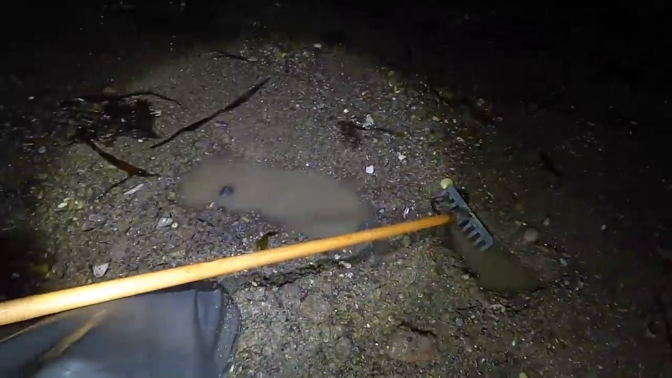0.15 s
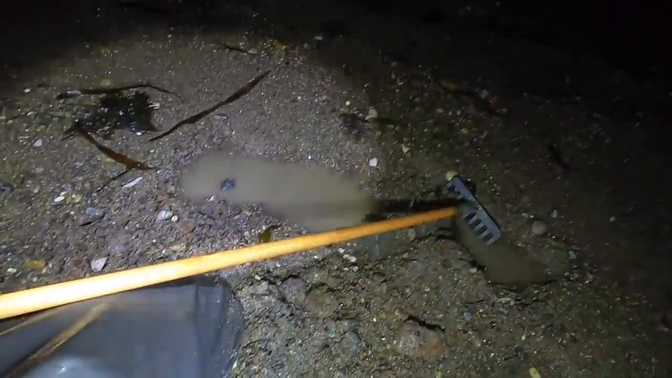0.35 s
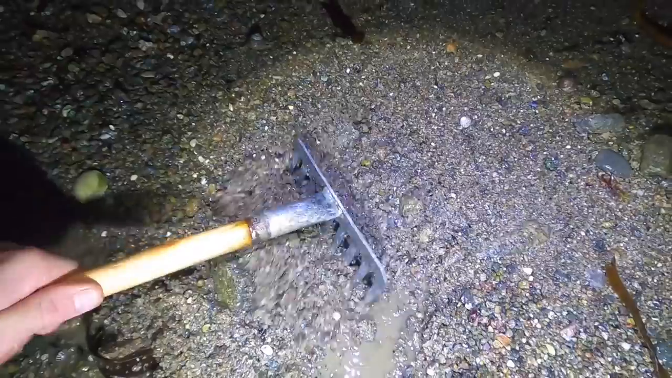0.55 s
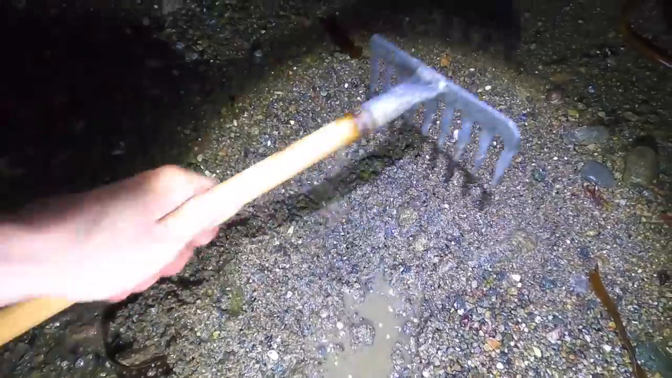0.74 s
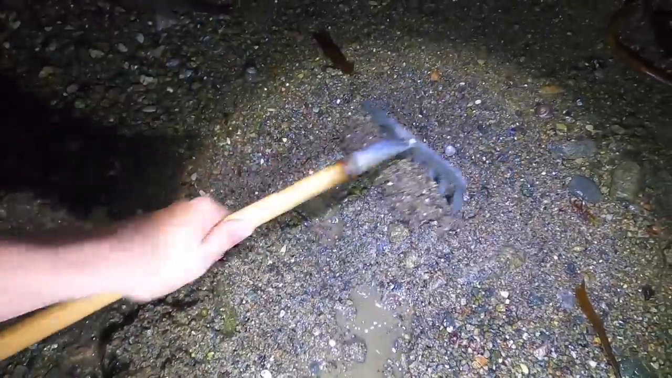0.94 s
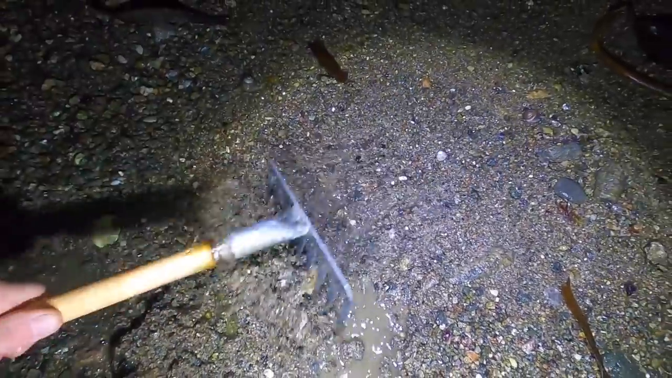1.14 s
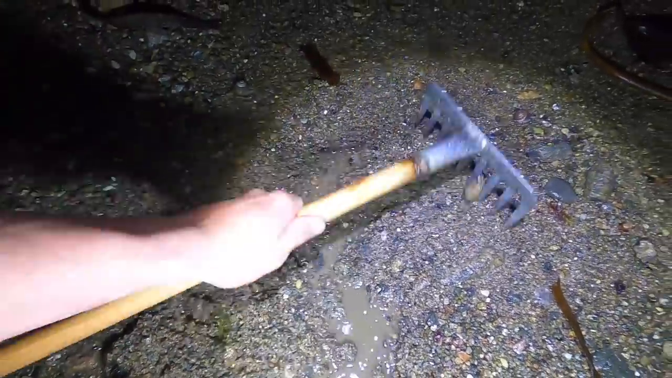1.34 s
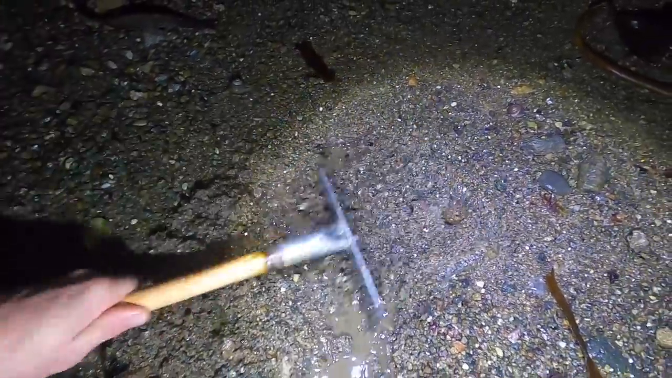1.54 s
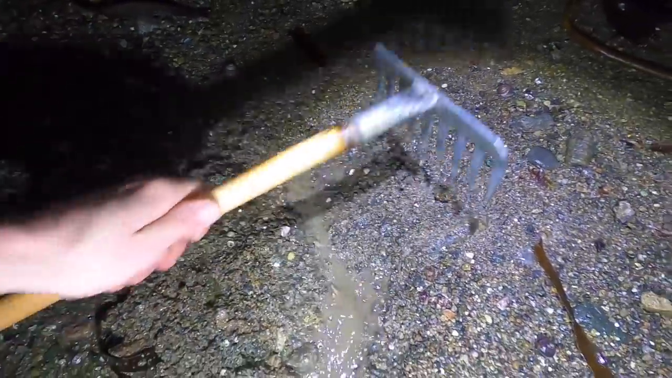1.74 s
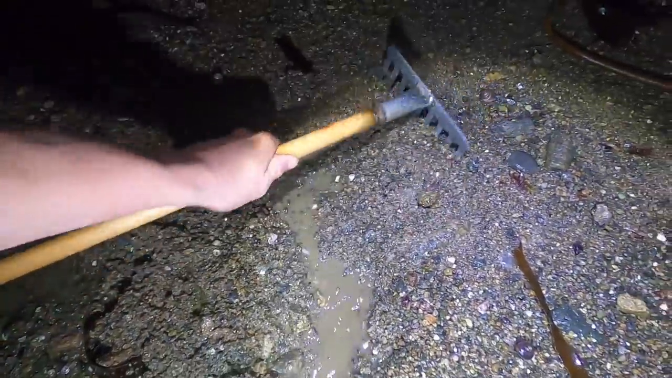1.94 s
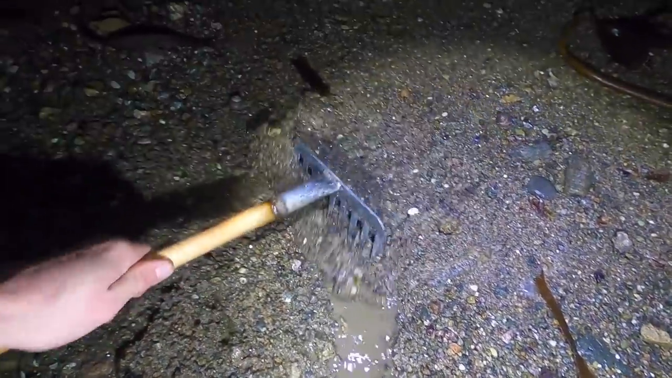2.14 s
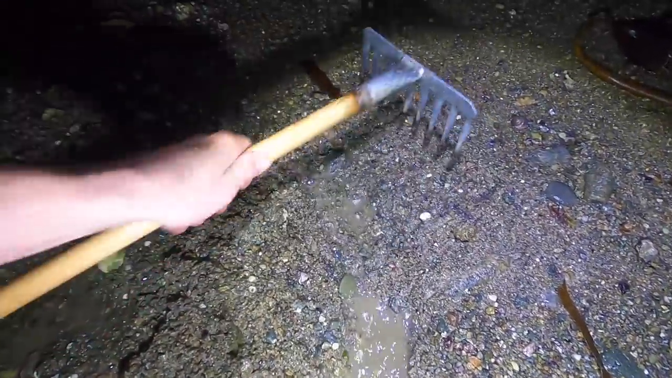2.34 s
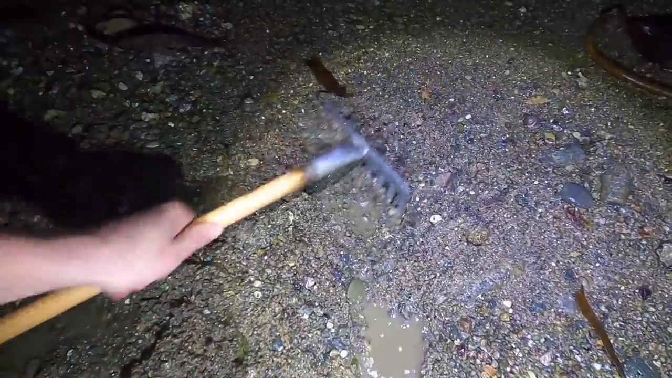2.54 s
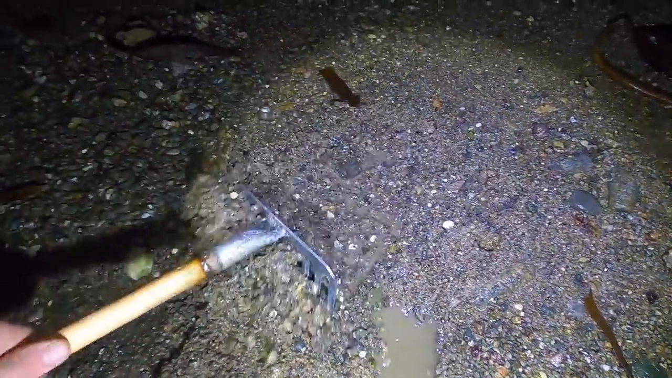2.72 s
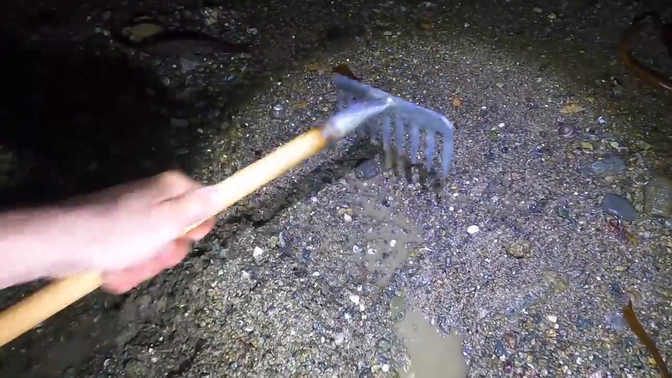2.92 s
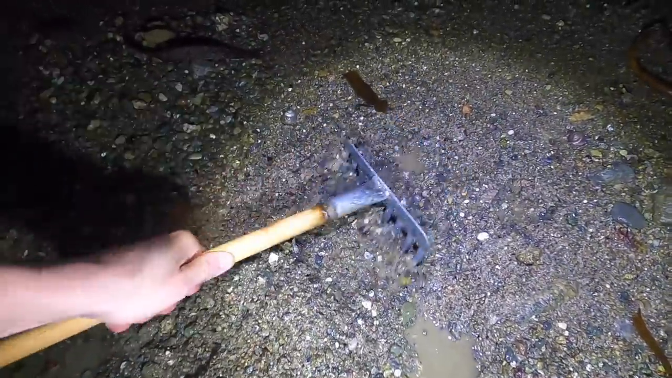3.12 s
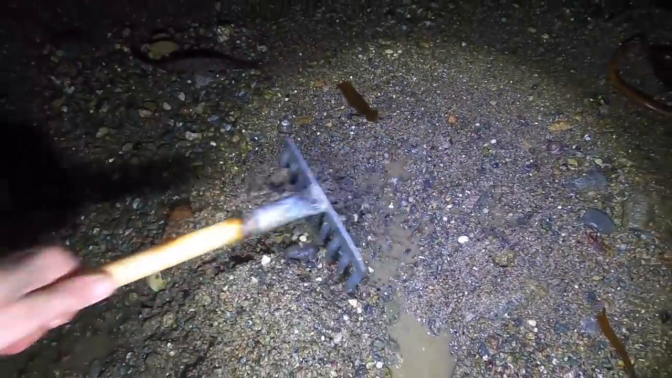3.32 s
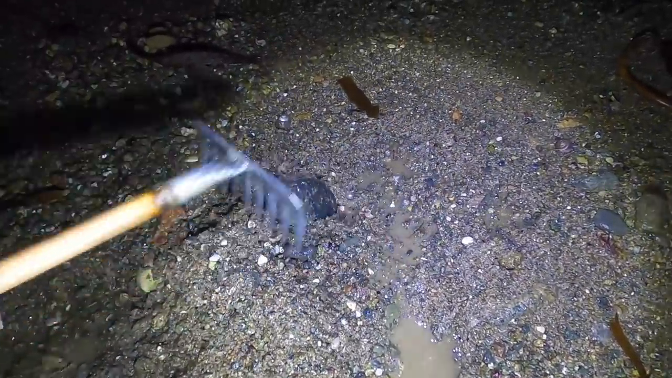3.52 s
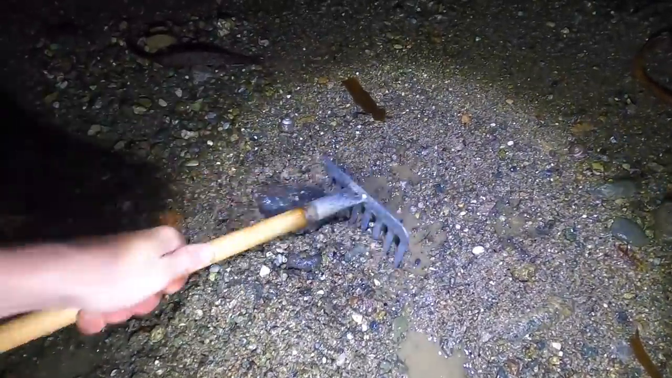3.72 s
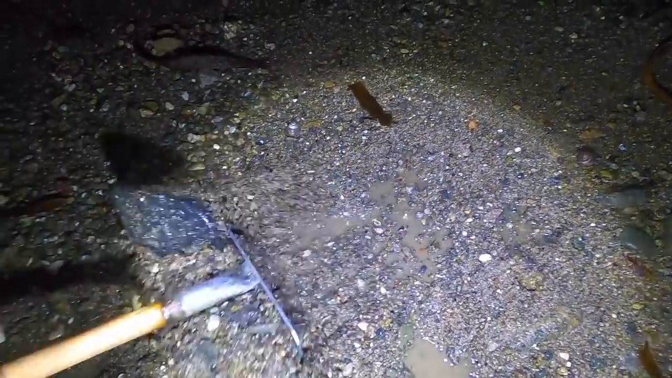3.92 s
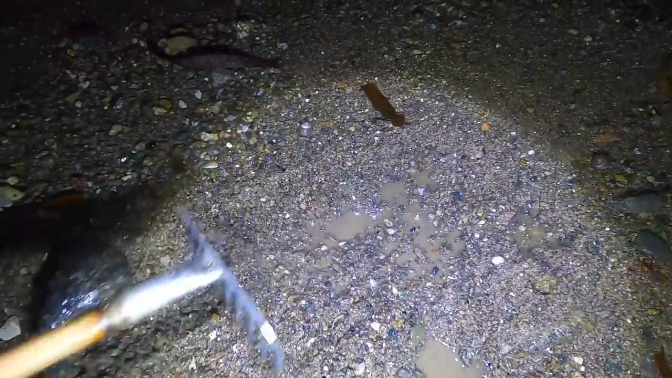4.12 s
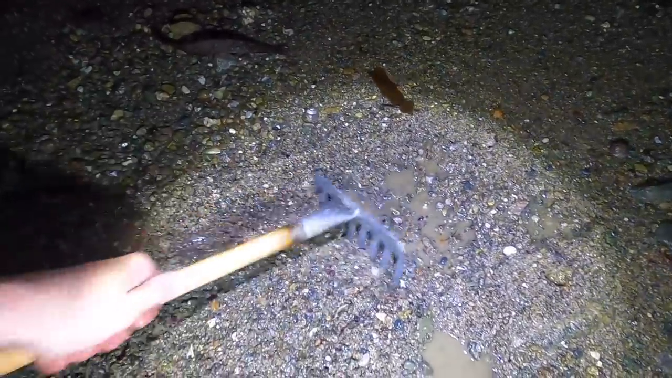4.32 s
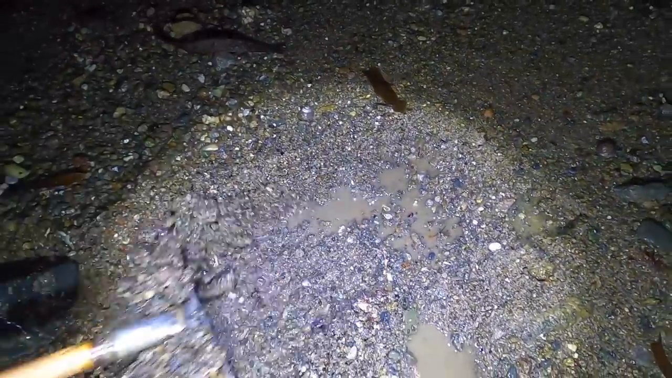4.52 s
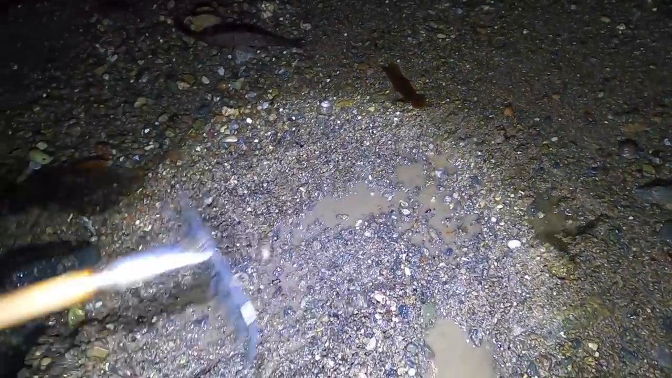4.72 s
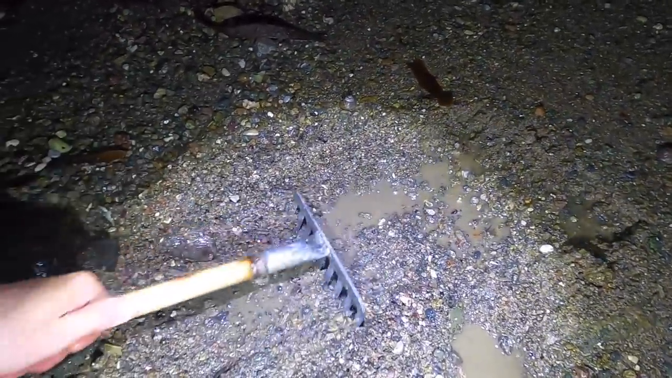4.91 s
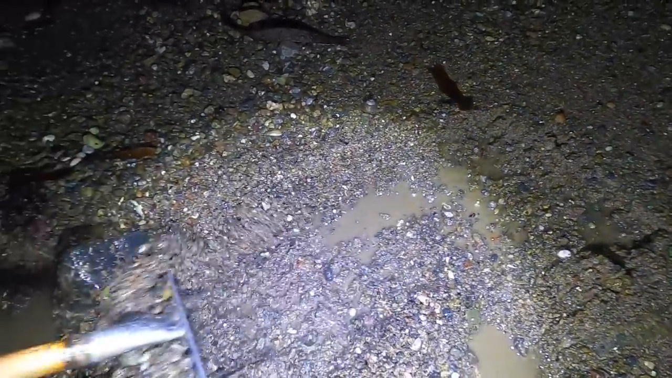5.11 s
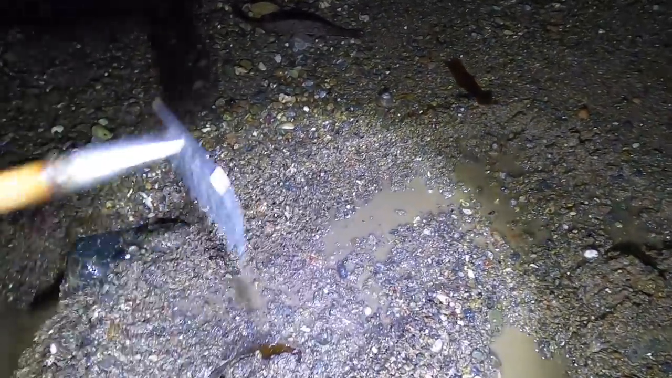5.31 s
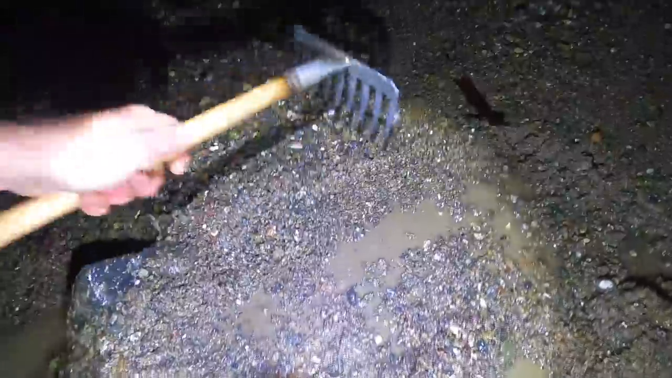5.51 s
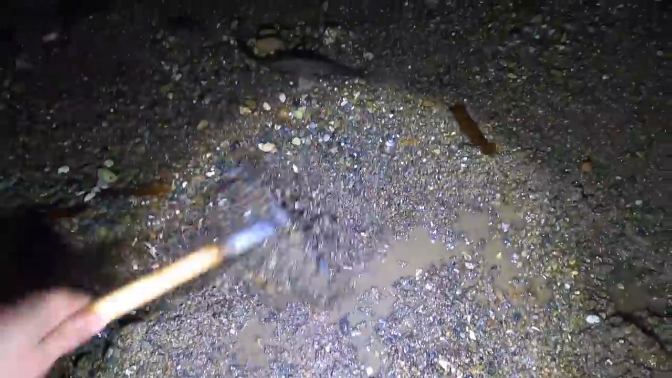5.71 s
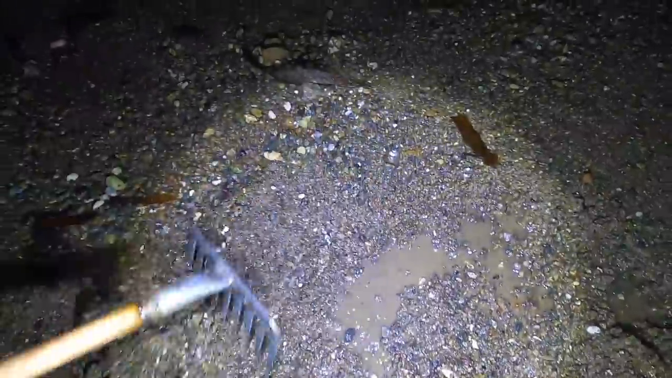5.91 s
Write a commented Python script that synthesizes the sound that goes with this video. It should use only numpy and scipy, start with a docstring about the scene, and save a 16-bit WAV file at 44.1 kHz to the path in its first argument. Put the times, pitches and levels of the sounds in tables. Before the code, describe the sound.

Close outdoor sound of a metal rake working wet, stony beach ground. A soft clothing shift comes first, then brisk, uneven strokes: tines stab in, crunch through pebbles and stop abruptly. Single stones knock brightly, steel briefly rubs on rock, and loose wet grit slides back in fine clicks. Light wind rumbles low on the microphone, strongest at the start and soft afterwards.

```python
"""On a gravel beach, a small steel rake works wet stones close by, after a faint rustle of clothing. Each
stroke stabs the tines in, stalls, then drags: random clicks, ringing pebbles and bright shells are filtered
into a crunch, and the clicks also ring the rake head. Single stones knock and the tines rub on rock. Wet grit
trickles back between strokes as fine clicks and tiny rings. Low-pitched noise makes the light wind that rumbles
on the microphone."""
import sys
import numpy as np
from scipy import signal
from scipy.fft import rfft, irfft
from scipy.io import wavfile

SR = 44100
rng = np.random.default_rng(int(sys.argv[2]) if len(sys.argv) > 2 else 0)


def dump_mix(stems):
    """Bounce the given channels to the path in sys.argv[1] as a 16-bit WAV at rate SR."""
    frames = np.atleast_2d(stems).T  # one column per channel
    limited = np.clip(frames, -1, 1)  # hard clip at full scale
    pcm = np.round(limited * 32767).astype(np.int16)
    wavfile.write(sys.argv[1], SR, pcm)


N = 267092
T = np.arange(N) / SR  # time of every sample [s]

# the rake is dragged: (time [s], length [s], time to bite [s], force midway [dB], swell from start to end [dB],
# thud of the packed bed [dB relative], coarse stones [dB relative], fine grit [dB relative],
# spill afterwards [dB relative])
PULLS = [(0.589, 0.059, 0.012, -18, 6, -22, -15.5, -7, -18.5),
         (1.008, 0.21, 0.051, -19.5, -11.5, -20.5, -6.5, -9, -13),
         (1.517, 0.21, .020, -21, -6.5, -17, -15, -7, -20),
         (2.043, 0.14, 0.071, -18, 4, -17.5, -7.5, -9, -16),
         (2.193, .051, 0.011, -26.5, 24, -14, -13.5, -8, -17),
         (2.575, 0.13, 0.029, -19.5, 6.5, -24.5, -9.5, -9.5, -0.5),
         (3.157, 0.091, 0.017, -21.5, 8, -23.5, -9, -5.5, -18),
         (3.858, 0.12, 0.024, -22, 6.5, -15, -2.5, -5, -9),
         (4.460, 0.18, 0.037, -21, -5, -23, -4.5, -8, -3),
         (5.017, 0.17, 0.014, -21.5, 4, -20, -4.5, -4.5, -8),
         (5.724, 0.12, 0.022, -21, -1.5, -23, -9.5, -7.5, 1.5)]
# tone of the dragged gravel: (frequency [Hz], gain [dB])
PULL_COLOUR = [(100, -23.5), (250, -17.5), (450, -11), (700, -0.5), (1000, 1), (1500, 5.5), (2300, 2.5),
               (4300, -1), (5500, -7), (7200, -8.5), (8200, -10.5), (11000, -15.5), (15500, -32.5)]
BITE_DB = -14  # a pull starts this far below full force
STOP_S = 0.0095  # the crunch dies this fast when the rake stops
# change from start to end of a pull as the tines sink: coarse stones grow, fine grit fades
SINK_COARSE_DB, SINK_FINE_DB = 7, -2
SINK_HEAVY_DB = -1  # the deepest clacks thin out as the rake comes nearer
# the heap pushed up by the tines tumbles to rest, fading ever faster
SPILL_S, SPILL_FALL_DB, SPILL_BEND = 0.098, -9, 1.64
SPILL_HEAVY_DB = -2.5  # few heavy stones roll in the spill

# the tines stab into the gravel: (time [s], length [s], force [dB], first touch [dB relative],
# coarse stones [dB relative])
STABS = [(0.578, 0.013, -20.5, -31, 7), (0.971, 0.014, -23.5, -15.5, 6), (1.482, .013, -19.5, -16.5, 1),
         (2.007, .017, -22.5, -14.5, 2), (2.544, 0.0081, -18.5, -11.5, -0.5),
         (3.108, .0043, -18.5, -11, -10), (3.127, 0.018, -22, -19, 4), (3.472, 0.011, -27.5, -0.5, 4),
         (3.809, 0.04, -19.5, -11, 1.5), (4.012, 0.022, -20, -7.5, 0), (4.418, 0.019, -20, -11, -1),
         (4.98, 0.027, -23.5, -5.5, 2), (5.691, 0.016, -18, -20, 4)]
# tone of the stabbed gravel: (frequency [Hz], gain [dB])
STAB_COLOUR = [(150, -43), (250, -7.5), (483, -14), (799, -10), (1130, -15.5), (1470, -12), (2220, 1.5),
               (2470, -7), (2940, -8), (3370, -4), (3880, -2.5), (5780, -9), (7360, -6), (11400, -17.5),
               (15800, -25.5)]
STAB_COARSE_HZ = 1910  # the coarse stones of a stab sound below this

# ways the rake head rings, damped by the gravel:
# (frequency before detuning [Hz], time to fade by 60 dB [s], level before random change [dB])
RAKE_MODES = [(646, 0.18, -48), (799, 0.11, -13.5), (1456, 0.034, -2.5), (1756, 0.037, -4),
              (2660, 0.013, 2.5), (2898, 0.051, 1.5), (3823, 0.034, 3), (4110, 0.017, 6.5),
              (4480, 0.04, -1), (4650, 0.25, -13.5), (6280, 0.033, -9.5), (6970, 0.012, 2.5)]
# a tine knocks a single stone: (time [s], strength [dB], pitch of the stone [Hz],
# time for its ring to fade by 60 dB [s], ring of the rake [dB relative])
KNOCKS = [(0.001, -27.5, 1473, 0.075, 12.5), (0.109, -20, 2460, 0.0017, -14),
          (0.645, -7.5, 2780, 0.038, -24), (0.733, -30.5, 4570, 0.1, -6), (1.133, -8.5, 2870, .008, -16),
          (1.147, -17, 5130, .03, -8), (1.265, -30, 810, 0.08, 9), (1.389, -19.5, 4630, 0.00082, -17),
          (1.542, -14.5, 3960, 0.007, 5), (1.572, -13, 2700, 0.023, 8.5), (1.611, -5.5, 1460, 0.034, -16),
          (1.655, -23, 830, 0.044, 0), (1.658, -24, 2040, 0.23, -6), (1.691, -11, 4070, 0.02, 2),
          (1.710, -16, 6760, .008, 3), (1.725, -33, 840, .19, 1), (1.788, -25.5, 980, .008, -19),
          (1.882, -27.5, 9100, 0.0075, -8), (1.922, -29, 2320, 0.0029, -16), (2.027, -10.5, 2740, .009, -8),
          (2.059, -21, 4100, 0.0081, 6), (2.103, -14, 1810, .01, -4), (2.186, -7.5, 3940, .006, 4.5),
          (2.551, -16, 3800, .015, 5), (2.597, -10, 2940, 0.02, -7), (2.609, -13, 7330, 0.033, 8),
          (2.749, -7.5, 4100, 0.014, -14), (3.111, -16, 6740, 0.032, 8.5), (3.163, -20.5, 1410, 0.15, -2),
          (3.246, -13.5, 630, 0.059, -5), (3.422, -13, 3840, 0.008, -2), (3.470, -17, 2990, 0.077, 8),
          (3.481, -23, 4490, 0.078, 2), (3.527, -29.5, 6840, 0.0068, 8), (3.596, -29, 4150, .034, -11),
          (3.874, -17.5, 1830, 0.016, -1), (3.976, -7, 4030, .025, -17), (4.09, -18, 1070, 0.037, -13),
          (4.104, -16, 815, .036, -3), (4.321, 0.5, 2470, 0.0021, -25), (4.428, -6.5, 4200, .011, -6),
          (4.439, -7.5, 2860, 0.014, -2), (4.526, -13, 980, 0.019, -18), (4.55, -10, 4060, .017, -1),
          (4.607, -11.5, 3770, .018, -12), (4.716, -12.5, 1770, 0.021, -7), (4.97, -23, 4570, 0.086, -12),
          (4.991, -9, 3870, 0.025, -4), (5.104, -17, 867, 0.011, 9.5), (5.166, -18, 880, .023, -5),
          (5.18, -20, 1800, 0.023, -13), (5.864, -16, 1020, 0.071, 7.5), (5.915, -13.5, 2020, 0.032, -22),
          (5.96, -15, 3230, .015, -9)]

# the tines rub along a buried rock, one list for each rub: (time [s], level [dB])
ROCK_RUBS = [
    [(1.55, -35), (1.59, -22), (1.68, -32.5), (1.73, -54), (1.80, -61)],
    [(3.38, -38), (3.42, -32), (3.48, -33.5), (3.55, -44), (3.66, -37.5), (3.71, -66)],
]
# ringing of that rubbing:
# (frequency before detuning [Hz], time to fade by 60 dB [s], level before random change [dB])
ROCK_MODES = [(678, 0.044, 0), (820, 0.028, 4), (1463, 0.023, 4), (2130, 0.023, 2), (2940, 0.054, 3),
              (4590, 0.054, -11)]

# wet grit slides back into the furrow: (time [s], length [s], strength at the start [dB],
# fading [dB per s], settling stones [dB relative], fine grit [dB relative])
SLIDES = [(0.67, .20, -34, 90, -2.5, -13.5), (1.274, 0.21, -48, 29, -3, -8.5),
          (1.757, 0.2, -49.5, 50, 1, -12), (2.355, 0.22, -58.5, 87, 2.5, -6),
          (2.94, 0.098, -41, 46, -7.5, -8.5), (3.315, 0.13, -34.5, 16, -5.5, -14.5),
          (3.497, 0.17, -40.5, -14, -2, -13.5), (3.703, 0.12, -48.5, 38, 2, -25),
          (4.043, 0.15, -32, 13, -1, -14.5), (4.234, 0.051, -29.5, 15, -5, -14),
          (4.355, 0.027, -36.5, 0, -2, -16), (4.717, 0.21, -34.5, 16, -6, -13.5),
          (5.29, 0.18, -39.5, -1, -10, -13), (5.458, 0.073, -35.5, 15, -11.5, -13),
          (5.56, .11, -43.5, 60, -2, -14), (5.943, 0.11, -34.5, 43, -10.5, -8.5)]
# tone of the sliding grit: (frequency [Hz], gain [dB])
TRICKLE_COLOUR = [(200, -27.5), (450, -3), (620, -11.5), (820, -1.5), (1800, -2), (4200, -7), (5500, -14),
                  (7400, -20), (8300, -24.5), (12500, -30.5), (15500, -39)]
SLIDE_START_S, SLIDE_STOP_S = 0.035, 0.05  # a slide gathers and comes to rest

# clothing shifts during the reach for the rake: (time [s], level before flutter [dB])
RUSTLE_LEVEL = [(0, -45.5), (0.07, -58), (0.2, -45.5), (0.3, -57), (0.39, -51.5), (0.56, -53.5),
                (0.66, -72)]
# tone of the fabric: (frequency [Hz], gain [dB])
RUSTLE_COLOUR = [(300, -1.5), (550, -1), (900, -5.5), (1500, -1), (2600, -6), (3100, -7.5), (3700, -5.5),
                 (5500, -12.5), (7500, -13.5), (8200, -21.5), (14000, -39)]

BREEZE_DB = -45  # the steady breeze, before its flutter
# gusts on the microphone: (time of the peak [s], half width [s], level before flutter [dB])
GUSTS = [(0.03, 0.026, -28.5), (0.21, 0.12, -32.5), (0.43, 0.046, -34.5), (0.56, 0.041, -32.5),
         (1.60, 0.047, -40), (2.10, 0.11, -35.5), (2.26, 0.032, -38.5), (2.66, 0.19, -35),
         (3.02, 0.07, -39), (3.22, 0.1, -39), (3.51, 0.1, -42.5), (3.76, 0.066, -38.5), (4.40, 0.16, -43.5),
         (4.98, 0.21, -40), (5.65, 0.22, -49)]
# the breeze drops for a moment: (time [s], half width [s], change [dB])
LULL = (1, 0.11, -8)
# tone of the wind: (frequency [Hz], gain [dB])
WIND_COLOUR = [(20, -1.5), (50, -0.5), (100, -6), (160, -10), (240, -20), (400, -23.5), (800, -47),
               (2000, -82)]
# the background starts wide and leaning left, then narrows to the centre:
# (time [s], side sound [dB relative], left minus right [dB])
BACKGROUND_WIDTH = [(0, -3, 6), (0.57, -3, 6), (0.66, -34, 0)]
TOP_HZ = 15700  # nearly nothing is left above this


def undb(db):
    """Turn decibels into a gain."""
    return 10 ** (np.asarray(db) / 20)


def unit(x):
    """Scale a sound to an average strength (rms) of 1."""
    return x / np.sqrt(np.mean(x ** 2))


def add(out, at, sound):
    """Mix a short sound in at a time in s."""
    i = int(at * SR)
    out[i:i + len(sound)] += sound[:len(out) - i]


def walk(rate):
    """Random wandering of rms 1: straight lines between fresh random values, rate of them a second."""
    knots = np.arange(0, 7, 1 / rate)
    return unit(np.interp(T, knots, rng.standard_normal(len(knots))))


def colour(x, points):
    """Shape the tone through (Hz, dB) points, with a filter that sounds only after its input."""
    hz, db = np.transpose(points)
    size = 4096
    freq = np.maximum(np.arange(size // 2 + 1) * SR / size, 1)
    log_gain = np.log(undb(np.interp(np.log(freq), np.log(hz), db)))
    # folding the cepstrum to one side keeps the gain and puts the energy first
    cepstrum = irfft(log_gain)
    cepstrum[1:size // 2] *= 2
    cepstrum[size // 2 + 1:] = 0
    response = irfft(np.exp(rfft(cepstrum)))
    return signal.fftconvolve(x, response)[:N]


def split(x, hz):
    """Return the parts below and above a frequency, without delay."""
    low = signal.sosfiltfilt(signal.butter(4, hz, fs=SR, output="sos"), x)
    return low, x - low


def ring(hz, t60):
    """One pure tone that fades by 60 dB in t60 seconds."""
    t = np.arange(int(t60 * SR) + 2) / SR
    return np.sin(2 * np.pi * hz * t) * np.exp(-np.log(1000) * t / t60)


def clicks(rate, spread_db, hardest=1.0):
    """Random contacts, on average rate a second, with scattered sizes and either sign; rms 1."""
    hit = rng.random(N) < rate / SR
    size = undb(spread_db * np.minimum(rng.standard_normal(N), hardest))
    return unit(hit * size * rng.choice([-1, 1], N))


def pebbles(rate, cycles, spread_db):
    """Stones of many sizes, each ringing for some cycles at its own pitch; rms 1."""
    out = np.zeros(N)
    draws = rng.random((int(rate * N / SR), 4))
    for when, size, force, damping in draws:
        hz = 550 * (1 + 3.6 * size) ** 2
        even = hz ** .75  # evens out the power per Hz
        gain = even * undb(spread_db * force ** 2)
        add(out, when * N / SR, gain * ring(hz, cycles * (.5 + damping) / hz))
    return unit(out)


def blow(modes, detune=0.018):
    """The answer to one blow, peak 1; mix and pitch of the modes shift with the tine that is hit and its load."""
    out = np.zeros(SR // 2)
    for hz, t60, db in modes:
        gain = undb(db + 2 * rng.standard_normal()) * rng.choice([-1, 1])
        pitch = hz * (1 + detune * rng.uniform(-0.865, 1))
        add(out, 0, gain * ring(pitch, t60))
    return out / np.abs(out).max()


def rubbed(contacts, modes, detune, count=140):
    """Contacts ring the modes; the load passes on some twenty times a second and shifts mix and pitch."""
    out = np.zeros(N)
    for part in np.array_split(np.arange(N), count):
        answer = blow(modes, detune)
        answer = answer / np.linalg.norm(answer)
        add(out, part[0] / SR, signal.fftconvolve(contacts[part], answer))
    return unit(out)


def crunch(points, pebble_db, clink_db, crack_db, rake_db, jam_db, jerk_db, jerk_hz):
    """Steel through gravel, rms 1: grit grinds and cracks, pebbles clack, shells clink and the head rings."""
    jerks = undb(jerk_db * np.clip(walk(jerk_hz), -2, 1.5))  # stones jam and let go
    grit = clicks(rate=9000, spread_db=0)
    cracks = clicks(rate=260, spread_db=5.0)
    contacts = (grit + undb(crack_db) * cracks) * jerks
    stones = pebbles(rate=2000, cycles=14.4, spread_db=17.0) * jerks
    shells = pebbles(rate=600, cycles=110, spread_db=14)
    # stones wedged between the tines pull the modes far from their free pitch
    wedged = rubbed(contacts, RAKE_MODES, detune=.22)
    head = rubbed(contacts, RAKE_MODES, detune=0.027)
    gravel = colour(contacts + undb(pebble_db) * stones + undb(clink_db) * shells, points)
    return unit(unit(gravel) + undb(jam_db) * wedged + undb(rake_db) * head)


def pulls(thud_db=1, heavy_db=-7, coarse_db=-1.04, middle_db=-2, fine_db=0, gain_db=-2.5, edge_s=0.004):
    """The rake bites, drags and stops, and its heap spills; coarse stones grow as the tines sink."""
    gravel = crunch(PULL_COLOUR, pebble_db=-7.5, clink_db=-6.5, crack_db=-3.5, rake_db=-7.0,
                    jam_db=-6.5, jerk_db=1.44, jerk_hz=127.8)
    # bigger stones sound lower, so bands of pitch stand for sizes
    thud, rest = split(gravel, 410)
    heavy, rest = split(rest, 840)
    coarse, rest = split(rest, 1980)
    middle, fine = split(rest, 5190)
    bands = [(thud, thud_db), (heavy, heavy_db), (coarse, coarse_db), (middle, middle_db), (fine, fine_db)]
    sizes = [undb(db) * unit(x) for x, db in bands]
    out = np.zeros(N)
    t = T[:SR]  # one second from the start of a pull
    for at, length, bite_s, db, swell_db, bed_db, stones_db, grit_db, spill_db in PULLS:
        depth = np.minimum(t / length, 1) - .5  # from -0.5 to 0.5 along the pull
        stopped = np.maximum(t - length, 0)
        bite = np.minimum(t / edge_s, 1) * undb(BITE_DB * np.maximum(1 - t / bite_s, 0))
        dragging = np.exp(-stopped / STOP_S)
        spill = undb(spill_db + SPILL_FALL_DB * (stopped / SPILL_S) ** SPILL_BEND)
        force = undb(db + swell_db * depth) * bite * np.maximum(dragging, spill)

        bed, cobbles, stones, grind, grit = (np.roll(x, -int(at * SR))[:SR] for x in sizes)
        thinning = undb(SINK_HEAVY_DB * depth + SPILL_HEAVY_DB * (1 - dragging))
        deep = thinning * (undb(bed_db) * bed + undb(stones_db) * cobbles)
        sinking_stones = undb(stones_db + SINK_COARSE_DB * depth) * stones
        fading_grit = undb(grit_db + SINK_FINE_DB * depth) * grit
        add(out, at, force * (deep + sinking_stones + grind + fading_grit))
    return undb(gain_db) * out


def stabs(rise_s=0.0041, fall_s=0.0088, touch_s=0.0087):
    """The tines brush the top stones, crush in, and stop."""
    gravel = crunch(STAB_COLOUR, pebble_db=-3.5, clink_db=-3.0, crack_db=-7.0, rake_db=-2.5,
                    jam_db=-6.5, jerk_db=2.5, jerk_hz=221.2)
    coarse, rest = split(gravel, STAB_COARSE_HZ)
    out = np.zeros(N)
    for at, length, db, touch_db, stones_db in STABS:
        brush = undb(touch_db) * np.exp(np.minimum(T - at, 0) / touch_s)
        crush = np.clip((T - at) / rise_s, 0, 1)
        stop = np.exp(-np.maximum(T - at - length, 0) / fall_s)
        force = undb(db) * np.maximum(brush, crush) * stop
        out += force * (undb(stones_db) * coarse + rest)
    return out


def knocks(stone_db=-2, rake_db=-2, crack_db=-7, crack_s=0.0022):
    """A sharp crack of noise, the stone's own short note and the ring of the steel."""
    notes, cracks = np.zeros(N), np.zeros(N)
    t = T[:SR // 50]
    for at, db, hz, t60, steel_db in KNOCKS:
        add(notes, at, undb(db + stone_db) * ring(hz, t60))
        add(notes, at, undb(db + steel_db + rake_db) * blow(RAKE_MODES))
        # the crack comes from the steel edge: soft when the tine barely touches
        edge_db = min(steel_db / 2, 0)
        crack = rng.standard_normal(len(t)) * np.exp(-t / crack_s)
        add(cracks, at, undb(db + crack_db + edge_db) * crack)
    # small things radiate little bass
    return split(notes + colour(cracks, PULL_COLOUR), 630)[1]


def rock_rub():
    """Steel sticks and slips on a rock: a stream of contacts sets it ringing."""
    force = np.zeros(N)
    for rub in ROCK_RUBS:
        # silent outside the rub
        force += undb(np.interp(T, *np.transpose(rub), left=-np.inf, right=-np.inf))
    return force * rubbed(clicks(rate=590, spread_db=-1.0), ROCK_MODES, detune=0.028)


def trickle(bubble_db=0, coarse_db=-2.5, middle_db=-2, fine_db=3.0, flutter_db=0.26):
    """Sand and water slide back and come to rest: a fine fizz with small bubbles and settling stones."""
    bubbles = pebbles(rate=2400, cycles=36, spread_db=9)
    fizz = clicks(rate=10000, spread_db=-3.5)
    coarse, rest = split(colour(fizz + undb(bubble_db) * bubbles, TRICKLE_COLOUR), 1910)
    middle, fine = split(rest, 6300)
    flow, stones, grit = np.zeros((3, N))
    for at, length, db, fade_db_per_s, stones_db, grit_db in SLIDES:
        t = np.clip(T - at, -.5, 1)
        ends = np.exp(np.minimum(t, 0) / SLIDE_START_S - np.maximum(t - length, 0) / SLIDE_STOP_S)
        slide = undb(db - fade_db_per_s * np.maximum(t, 0)) * ends
        # where slides overlap, the stronger one is heard
        flow = np.maximum(flow, slide)
        stones = np.maximum(stones, undb(stones_db) * slide)
        grit = np.maximum(grit, undb(grit_db) * slide)
    mix = undb(coarse_db) * stones * unit(coarse)
    mix += undb(middle_db) * flow * unit(middle)
    mix += undb(fine_db) * grit * unit(fine)
    return undb(flutter_db * walk(60)) * mix


def rustle(flutter_db=4.0, crease_db=-8):
    """Stiff fabric: a soft hiss of noise with small creases snapping in it."""
    creases = clicks(rate=120, spread_db=4)
    hiss = rng.standard_normal(N)
    fabric = unit(colour(hiss + undb(crease_db) * creases, RUSTLE_COLOUR))
    level_db = np.interp(T, *np.transpose(RUSTLE_LEVEL))
    return undb(level_db + flutter_db * walk(39.4)) * fabric


def wind(gust_db=1.16):
    """Low eddies buffet the microphone: a light breeze with gusts that swell and die away."""
    eddies = unit(colour(rng.standard_normal(N), WIND_COLOUR))
    at, width, db = LULL
    breeze = undb(BREEZE_DB + db * np.exp(-((T - at) / width) ** 2))
    power = breeze ** 2
    for at, width, db in GUSTS:
        power += undb(db) ** 2 * np.exp(-((T - at) / width) ** 2)
    return np.sqrt(power) * undb(gust_db * walk(15)) * eddies


def background():
    """Wind and rustle, partly shared by the two ears: a middle sound plus a side sound of opposite sign."""
    s, *columns = np.transpose(BACKGROUND_WIDTH)
    side_db, lean_db = (np.interp(T, s, c) for c in columns)
    mid, side = (wind() + rustle() for _ in range(2))
    sign = np.array([[1], [-1]])  # left, right
    return undb(sign * lean_db / 2) * (mid + sign * undb(side_db) * side)


def scene(treble_side_db=-3, treble_right_db=3, body_side_db=-35, lag_s=0.0041):
    """The raking is straight ahead, close to the centre, over the wind and rustle."""
    raking = pulls() + stabs() + knocks() + rock_rub() + trickle()
    # a side signal, opposite in left and right: the raking delayed, its phase turned at random
    delayed = signal.hilbert(np.interp(T - lag_s, T, raking, left=0))
    side = np.real(delayed * np.exp(1j * np.pi * walk(90)))
    # below and above 11.8 kHz the side signal has its own level
    steep = signal.butter(12, 11800, fs=SR, output="sos")
    body, body_side = signal.sosfiltfilt(steep, [raking, side])
    treble, treble_side = raking - body, side - body_side
    sign = np.array([[1], [-1]])  # left, right
    top = (treble + sign * undb(treble_side_db) * treble_side) * undb(-sign * treble_right_db / 2)
    return body + sign * undb(body_side_db) * body_side + top + background()


def record(dry):
    """The recorder rounds the highest peaks and cuts the top."""
    rounded = np.tanh(1.104 * dry) / 1.028
    return signal.sosfilt(signal.ellip(10, .2, 80, TOP_HZ, fs=SR, output="sos"), rounded)


dry = scene()
out = record(dry)
dump_mix(out)
```